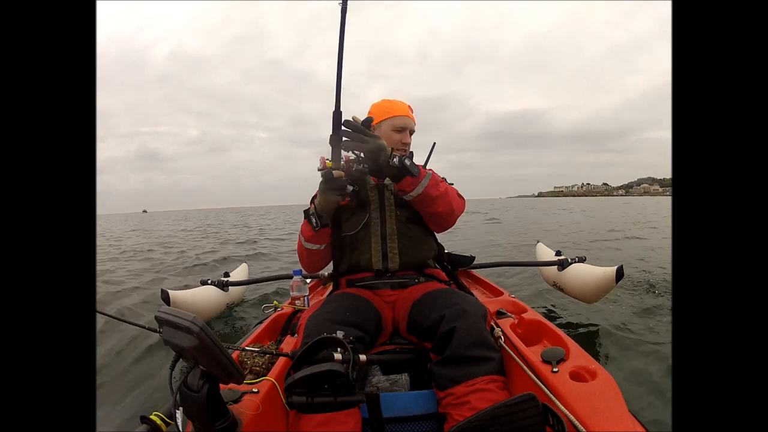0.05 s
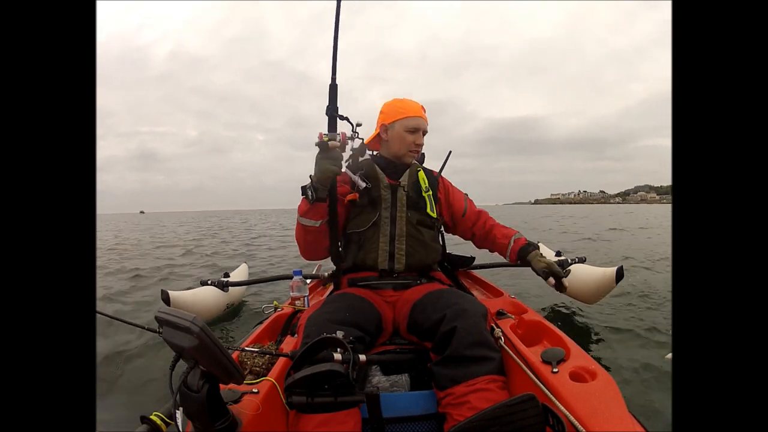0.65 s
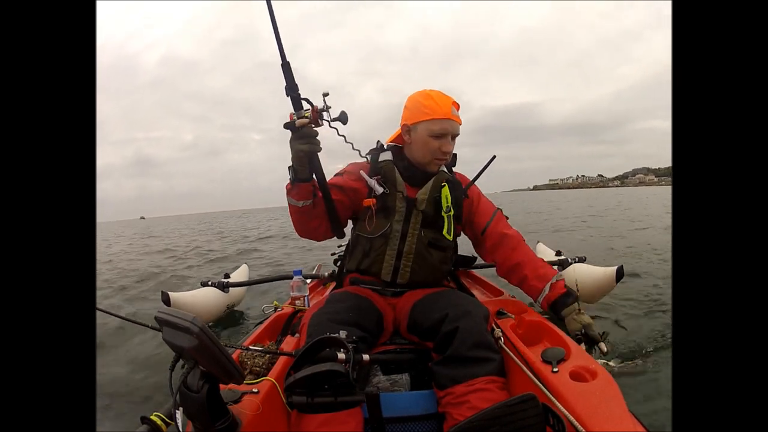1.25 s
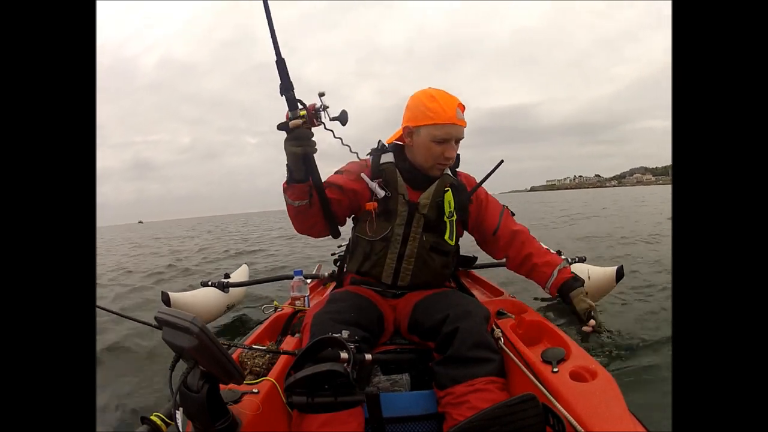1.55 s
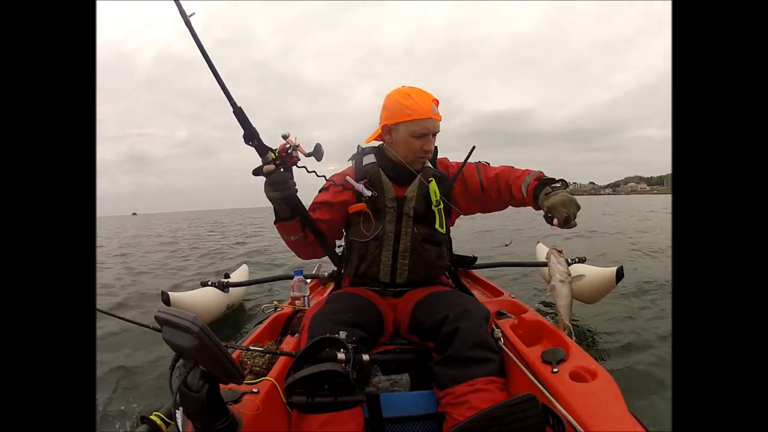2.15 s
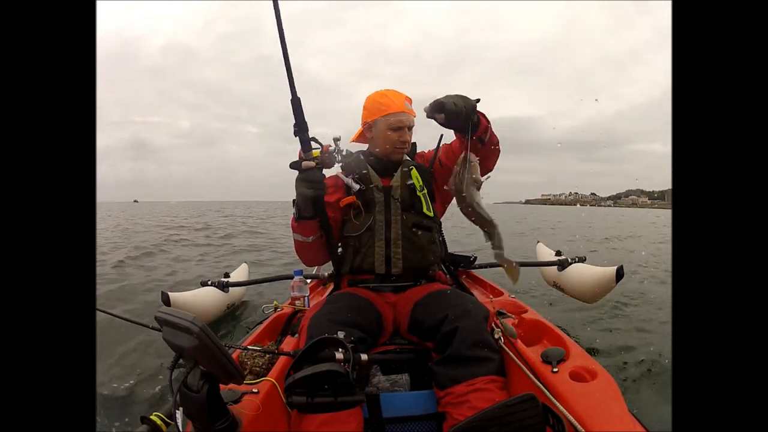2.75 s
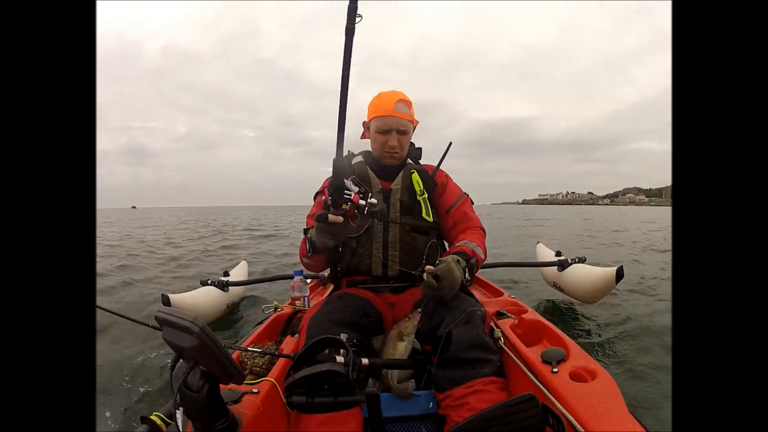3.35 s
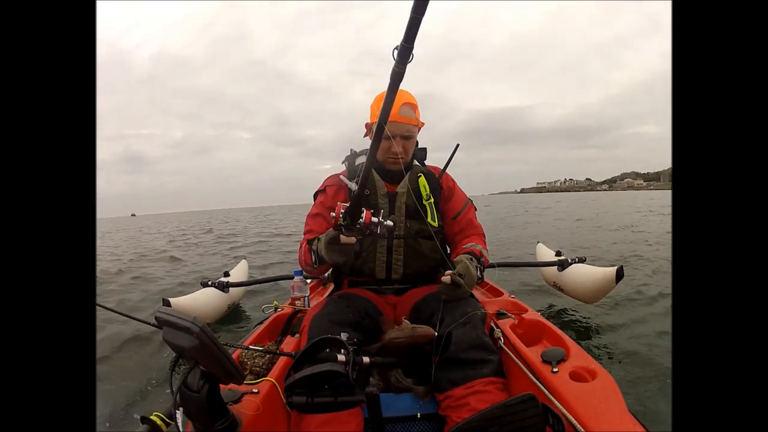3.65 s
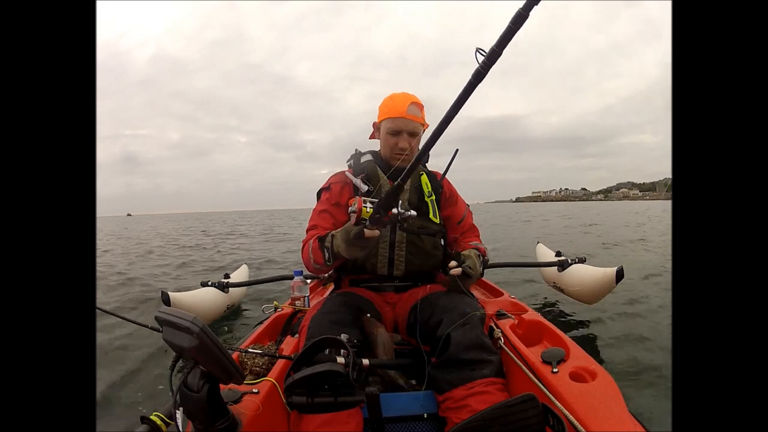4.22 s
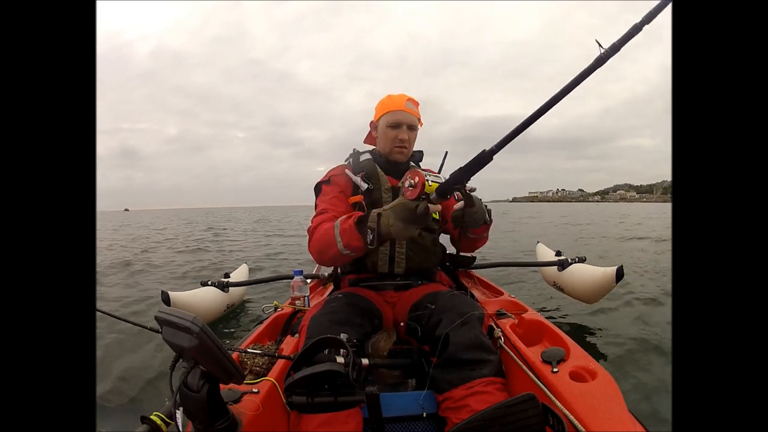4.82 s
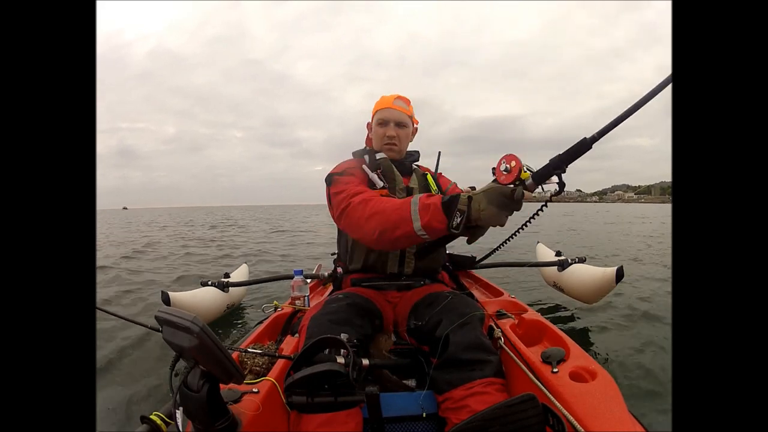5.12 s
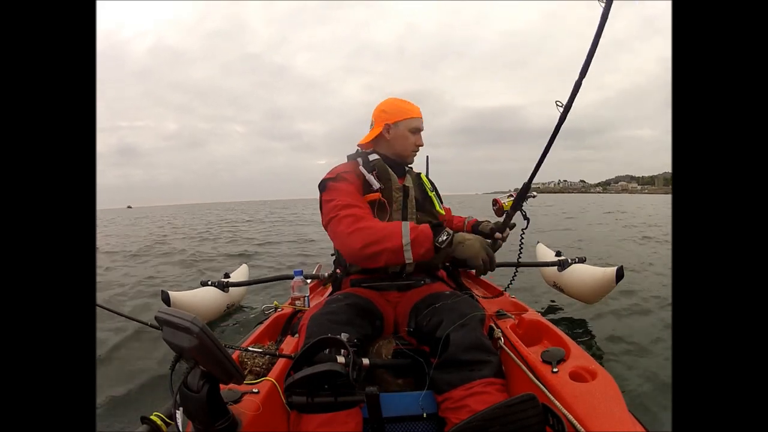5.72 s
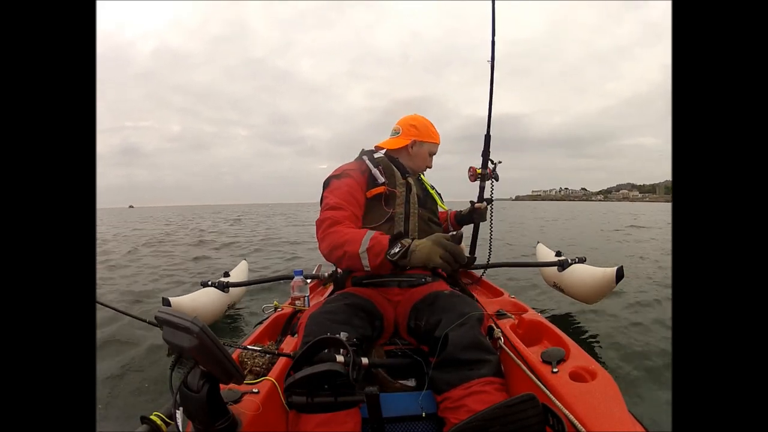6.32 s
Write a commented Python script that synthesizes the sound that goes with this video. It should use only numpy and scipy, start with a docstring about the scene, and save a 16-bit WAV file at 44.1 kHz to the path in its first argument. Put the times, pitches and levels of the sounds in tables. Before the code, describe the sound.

Heard close from the deck of a plastic kayak at sea, wavelets knock and splash on the hollow hull over a soft wind rumble. Tackle clicks against the shell and water trickles. A fish hits the deck hard, then flaps and thumps for about a second before the irregular slaps of water take over again. The knocks have a slightly gritty, lo-fi edge.

```python
"""A plastic kayak on a light chop, heard close and in mono from a camera microphone fixed to the deck.
A light wind rumbles over the wash of the sea. From the start wavelets slap the hollow hull, which knocks,
thumps and booms; water trickles and bubbles, and the angler's tackle clicks on the shell. At 2.7 s a fish
swung aboard lands hard and thrashes until about 4 s; then wavelets and tackle carry on. The camera's
coarse sampling adds a gritty sheen to every knock."""
import sys
import numpy as np
from scipy import signal
from scipy.fft import rfft, irfft
from scipy.io import wavfile

SR = 44100
rng = np.random.default_rng(int(sys.argv[2]) if len(sys.argv) > 2 else 0)


def transcribe(u):
    """Save the signal u as a 16-bit wav file named by the first command-line argument.

    u: samples, shape (n,) or (channels, n), limited to [-1, 1]; the rate is SR.
    q: integer samples, one column per channel.
    """
    v = np.clip(np.atleast_2d(u).T, -1, 1)
    q = np.round(v * 32767).astype(np.int16)
    wavfile.write(sys.argv[1], SR, q)


N = 281358

# Wavelets slapping under the hull. Each row: start in seconds, knock level in dB, knock centre in Hz,
# thump level in dB, panel pitch in Hz.
WAVELET_SLAPS = [(.121, -34, 1024, -41, 178), (0.1301, -24, 1020, -49, 178),
                 (0.5297, -20.5, 1283, -60, 178), (0.599, -29, 1193, -42, 180), (.612, -21, 1007, -33, 195),
                 (1.374, -24.5, 1397, -37.5, 166), (1.439, -34.5, 1055, -29.5, 163),
                 (1.4802, -24, 1060, -17.5, 179.7), (1.779, -27.5, 1045, -32, 164),
                 (1.829, -18, 1100, -57, 180), (1.835, -23.5, 910, -28.5, 174.7),
                 (2.009, -26, 1110, -20.5, 190.5), (2.046, -64, 830, -25.5, 145),
                 (2.143, -55, 830, -40, 119), (2.2445, -25, 950, -32.5, 212),
                 (2.291, -31.5, 760, -26.5, 116), (2.346, -26, 770, -32.5, 154),
                 (3.141, -28, 1305, -28, 129), (3.184, -17.5, 1060, -17.5, 157.4),
                 (3.233, -49, 1000, -24, 126), (4.439, -44.5, 1060, -30, 131.5),
                 (4.4649, -18.5, 1030, -31.5, 158), (4.807, -27, 946, -43.5, 210),
                 (4.821, -29, 714, -34, 204), (4.954, -26, 930, -16.5, 174.2),
                 (5.3839, -29.5, 933, -32.5, 202.5), (5.3938, -26, 828, -56, 205.6),
                 (5.629, -31, 921, -34.5, 183), (5.867, -28, 1140, -52.5, 180),
                 (5.875, -22, 1010, -27.5, 177.2), (6.128, -47.5, 1180, -38.5, 177.4),
                 (6.234, -16, 1020, -23.5, 191)]
# The colour of splashes and glancing touches on the shell. Each row: frequency in Hz, density in dB.
SHELL_COLOUR = [(200, -23.5), (380, -13), (490, -15), (630, 2), (780, -1.5), (900, 3.5), (1040, 6.5),
                (1250, -20), (1400, -5), (1700, 0.5), (2100, -2.5), (2600, -15), (3600, -10.5)]
# The fish landing and thrashing on deck. Each row: start in seconds, knock level in dB, crack in dB
# relative to that, thump level in dB, panel pitch in Hz, boom level in dB.
FISH_FLAPS = [(2.743, 0, -18.5, -0.5, 168.1, -29), (2.83, -32, -34, -28, 171, -27.5),
              (3.077, -39, -15, -26.5, 159, -31.5), (3.285, -17.5, -18.5, -18, 179, -19),
              (3.418, -8, -29.5, -7.5, 190, -22.5), (3.444, -21.5, -29, -36, 170, -48),
              (3.472, -2, -31.5, -9, 154.4, -30.5), (3.523, -28, -25, -17.5, 213, -26),
              (3.538, -13, -50, -38, 190, -45), (3.559, -19.5, -48, -45, 189, -55),
              (3.579, -23.5, -29, -13.5, 193, -39), (3.623, -16, -34, -16.5, 189, -52),
              (3.666, -23.5, -28, -24.5, 177, -59), (3.69, -21.5, -29, -15, 196, -55),
              (3.84, -27, -20, -30.5, 194, -58.5), (3.856, -23.5, -46, -36, 180, -50),
              (3.921, -32.5, -33, -42, 175, -49), (3.95, -21.5, -35, -24.5, 171, -30),
              (3.966, -20, -24.5, -23.5, 166, -41), (4.033, -24, -12.5, -25.5, 158.3, -27)]


def from_db(db):
    """Decibels to gain."""
    return 10 ** (np.asarray(db) / 20)


def rms_one(x):
    """Scale to rms 1."""
    return x / np.sqrt(np.mean(x ** 2) + 1e-20)


def add(track, s, sound):
    """Mix a sound into a track from s seconds on."""
    at = max(round(s * SR), 0)
    track[at:at + len(sound)] += sound[:max(N - at, 0)]


def colour(x, points):
    """Shape a steady signal by a spectrum of (Hz, dB) points; rms 1."""
    hz, db = np.transpose(points)
    bins = np.maximum(np.fft.rfftfreq(len(x), 1 / SR), 1)
    return rms_one(irfft(rfft(x) * from_db(np.interp(np.log(bins), np.log(hz), db)), len(x)))


def focus(points, centre_hz, tilt_db):
    """Tilt a spectrum down on both sides of a centre, by tilt_db one octave off."""
    hz, db = np.transpose(points)
    return np.column_stack([hz, db - tilt_db * np.abs(np.log2(hz / centre_hz)) ** 1.3])


def band(x, low_hz, high_hz):
    """Causal band-pass."""
    return signal.sosfilt(signal.butter(2, [low_hz, high_hz], "band", fs=SR, output="sos"), x)


def resonance(x, hz, width_hz):
    """Two-pole resonance with gain 1 at its peak."""
    r = np.exp(-np.pi * width_hz / SR)
    poles = [1, -2 * r * np.cos(2 * np.pi * hz / SR), r * r]
    return signal.lfilter(np.array([1, 0, -1]) * (1 - r * r) / 2, poles, x + 1e-18)


def drift(per_s):
    """A random wander of rms 1."""
    steps = rng.standard_normal(int(per_s * N / SR) + 2)
    return rms_one(np.interp(np.arange(N) * per_s / SR, np.arange(len(steps)), steps))


def swell(t, rise_s, t60, hold_s=0):
    """A smooth rise to 1, a hold, then a decay of 60 dB in t60 seconds."""
    rise = np.sin(np.pi / 2 * np.minimum(t / rise_s, 1)) ** 2
    return rise * from_db(-60 * np.maximum(t - rise_s - hold_s, 0) / t60)


def burst(noise, envelope):
    """A signal under an envelope, as strong as a sine under it would be."""
    x = noise * envelope
    return x * np.sqrt(np.sum(envelope ** 2) / (2 * np.sum(x ** 2)))


def droplets(per_s, spread_db, cycles, pitches=18):
    """Small bubbles burst at random, each ringing a few cycles at one of a set of pitches."""
    sizes = from_db(spread_db * np.minimum(rng.exponential(1, N), 4)) * rng.choice([-1, 1], N)
    pops = sizes * (rng.random(N) < per_s / SR)
    pitch_index = rng.integers(0, pitches, N)
    return rms_one(sum(resonance(pops * (pitch_index == k), hz, hz / cycles) / np.sqrt(hz)
                       for k, hz in enumerate(np.geomspace(550, 3600, pitches))))


def rumble_and_sea(lump_db=4.5, ripple_db=1.5):
    """A lumpy low rumble, the even wash of open water and a faint, steady patter of tiny droplets."""
    # The level of the low rumble: light wind, swelling with the hull's booming after heavy blows.
    # Each row: time in seconds, level in dB.
    rumble_levels = [(0, -58), (.2, -55), (.45, -56), (.75, -48.5), (1.002, -54.5), (1.3, -57), (2.15, -51),
                     (2.5, -62.5), (3.1, -46.5), (4.102, -41.5), (4.35, -50), (4.55, -47), (4.72, -52),
                     (4.949, -37.5), (5.298, -54), (6.38, -56.5)]
    # The colour of the rumble. Each row: frequency in Hz, density in dB.
    rumble_colour = [(20, -3.5), (40, -6), (80, -0.5), (130, 3.5), (185, 2.5), (250, -8.5), (400, -20.5),
                     (600, -37)]
    # The colour of the sea's wash. Each row: frequency in Hz, density in dB.
    wash_colour = [(200, -7), (400, -0.5), (680, 1.5), (850, -2.5), (1010, 4.5), (1300, -7.5), (1700, -3),
                   (2500, -10), (3300, -7), (3700, -10)]
    rumble_db = np.interp(np.arange(N) / SR, *np.transpose(rumble_levels)) - 1.5
    white = rng.standard_normal((2, N))
    rumble = from_db(rumble_db + lump_db * drift(per_s=34)) * colour(white[0], rumble_colour)
    wash = from_db(-64 + ripple_db * drift(per_s=34)) * colour(white[1], wash_colour)
    patter = from_db(-76) * droplets(per_s=84, spread_db=-4.5, cycles=14)
    return rumble + wash + patter


def contacts(fish_hz=770, tackle_hz=1156):
    """Wavelets, fish and tackle all strike the shell."""
    # Hard tackle clicking against the shell. Each row: start in seconds, level in dB.
    tackle_clicks = [(0.23, -45), (0.663, -46), (.705, -32), (0.795, -40), (1.056, -43.5), (1.8125, -35),
                     (2.002, -35), (2.627, -50), (2.932, -40.5), (2.971, -35.5), (3.358, -36), (4.415, -34),
                     (4.563, -49.5), (5.001, -42), (5.08, -43), (5.415, -43.5), (5.828, -46), (6.124, -36)]
    # Each row: start in seconds, level in dB, centre in Hz, relative crack in dB, heft in dB.
    return ([(s, db, hz, (thump_db - db) / 2 - 27, thump_db) for s, db, hz, thump_db, _ in WAVELET_SLAPS]
            + [(s, db, fish_hz, crack_db, thump_db) for s, db, crack_db, thump_db, _, _ in FISH_FLAPS]
            + [(s, db, tackle_hz, -5, db) for s, db in tackle_clicks])


def shell_knocks(rise_s=0.00092, glide=0.14, glide_s=0.0041, damping_s=0.0074, touch_s=0.012):
    """Each knock on the plastic: a light first touch, a sagging ring, the modes around it and a crack."""
    # Short modes of the plastic shell. Each row: frequency in Hz, level in dB.
    shell_modes = [(430, -5), (520, -7.5), (615, -2.5), (690, -4.5), (775, -2), (860, -2), (1015, 4.5),
                   (1120, -0.5), (1270, -2.5), (1395, -1.5), (1530, -6), (1650, 3), (1790, 2.5),
                   (1965, -11), (2120, -3.5)]
    t, out = np.arange(SR // 8) / SR, np.zeros(N)
    rows = contacts()
    white = rng.standard_normal((len(rows), 3, len(t)))
    for (s, db, hz, crack_db, heft_db), (chance, grit, brush) in zip(rows, white):
        # a heavy blow presses on for longer, wakes a wider range of modes and dies faster
        weight = np.clip(2 + db / 19.5, 0, 1)
        tilt_db, hold_s = 22 - 11 * weight, 0.0057 * weight
        t60 = 0.051 * 2 ** ((-28 - db) / 57)
        envelope = swell(t, rise_s, t60, hold_s) + from_db(-29.5) * swell(t, rise_s, t60=0.14)
        # the pitch sags through its centre as the contact spreads
        ring_hz = hz * (1 + glide * (2 * np.exp(-t / glide_s) - 1))
        ring = np.sin(2 * np.pi * np.cumsum(ring_hz) / SR)
        # each place of contact gives the modes strengths and phases of its own; high modes die first
        mode_hz, mode_db = focus(shell_modes, hz, tilt_db).T
        strength, phase = chance[:2 * len(mode_hz)].reshape(2, -1)
        fading = np.exp(-np.maximum(mode_hz[:, None] / hz - 1, 0) * t / damping_s)
        partials = fading * np.sin(2 * np.pi * (mode_hz[:, None] * t + phase[:, None]))
        modes = from_db(mode_db + 3 * strength) @ partials
        shell = burst(rms_one(modes) + from_db(5.5) * (1 - weight) * rms_one(ring), envelope)
        crack = burst(band(grit, 990, 3400), swell(t, rise_s=0.00067, t60=0.034, hold_s=hold_s))
        add(out, s, from_db(db) * (from_db(-5) * shell + from_db(crack_db) * crack))
        # the mass brushes the hull just before it lands
        touch_db = min(heft_db - 14, -40.5)
        touch = burst(colour(brush, focus(SHELL_COLOUR, hz, tilt_db)), swell(t, touch_s, t60))
        add(out, s - touch_s, from_db(touch_db) * touch)
    return out


def flexes(lag_s=0.003):
    """A panel gives just after a slap, swinging longer for a strong one; the fish's weight damps it."""
    # Each row: start in seconds, level in dB, panel pitch in Hz, t60 in seconds, boom level in dB.
    slaps = [(s + lag_s, db, hz, 0.092 * 2 ** ((db + 29.5) / 21.5), db - 18)
             for s, _, _, db, hz in WAVELET_SLAPS]
    flaps = [(s, db, hz, min(0.024 * 2 ** (-db / 9), 0.1), boom_db)
             for s, _, _, db, hz, boom_db in FISH_FLAPS]
    return slaps + flaps


def thumps_and_boom(boom_hz=74.26, thud_band_hz=(70, 240), low_cut_hz=57):
    """A struck panel swings for a few cycles; the whole hollow hull booms on below it. Returns both."""
    t, panels, boom = np.arange(SR) / SR, np.zeros(N), np.zeros(N)
    for s, db, hz, t60, boom_db in flexes():
        envelope = swell(t, rise_s=0.0036, t60=t60)
        swing = np.sin(2 * np.pi * hz * t) * envelope
        low_noise = band(rng.standard_normal(len(t)), *thud_band_hz)
        thud = band(burst(low_noise, envelope), *thud_band_hz)
        add(panels, s, from_db(db) * (swing + from_db(-10.5) * thud))
        hollow = np.sin(2 * np.pi * boom_hz * t) * swell(t, rise_s=0.011, t60=0.56)
        add(boom, s, from_db(boom_db) * hollow)
    # the panels' thumps carry no deep bass below about 57 Hz
    return signal.sosfilt(signal.butter(2, low_cut_hz, "high", fs=SR, output="sos"), panels), boom


def hull_ring(blows, split_hz=420, build_s=0.012):
    """Every blow leaves the hull ringing: a few clear modes and a dense tail whose lows last longest."""
    # Long modes of the hull. Each row: frequency in Hz, width in Hz, gain in dB.
    hull_modes = [(102, 20, -17), (122, 6.6, -8.5), (144, 8, -11), (186, 3.4, -16.5), (184.3, 7.3, -4.5),
                  (210, 24, -6), (259.9, 3.1, -20), (383, 9.1, 6.5), (652, 16, 2), (1020, 39, -19.5)]
    # The colour of the hull's dense after-ring. Each row: frequency in Hz, density in dB.
    tail_colour = [(50, -23.5), (110, 6.5), (190, -4.5), (300, -6), (450, -5), (680, -2.5), (1020, -32),
                   (1300, -22), (2200, -31), (3600, -24.5)]
    t = np.arange(SR) / SR
    dense = colour(rng.standard_normal(len(t)), tail_colour)
    tail = band(dense, 27, split_hz) * swell(t, build_s, t60=0.41)
    tail += band(dense, split_hz, 3500) * swell(t, build_s, t60=0.26)
    tail /= np.sqrt(np.mean(np.abs(rfft(tail)[100:1100]) ** 2))   # rms gain 1 from 100 to 1100 Hz
    modes = sum(from_db(db) * resonance(blows, hz, width) for hz, width, db in hull_modes)
    return modes + from_db(-12.5) * signal.fftconvolve(blows, tail)[:N]


def splashes(slap_splash_s=0.084, slap_splash_hz=1180):
    """Trickles, and a splash at each slap: droplets bursting against the shell, fine spray above."""
    # Water splashing and running off the hull. Each row: start in seconds, length in seconds,
    # level in dB, centre in Hz.
    trickles = [(.438, 0.02, -53, 880), (.65, 0.39, -56.5, 875), (1.409, 0.12, -45.5, 1220),
                (1.764, 0.12, -50.5, 1260), (1.974, 0.066, -42, 1360), (2.568, 0.42, -59, 1285),
                (2.752, 0.16, -45.5, 1154), (2.915, 0.27, -50, 890), (3.5, 0.28, -43.5, 730),
                (3.915, 0.14, -39.5, 850), (4.391, 0.13, -53, 1445), (4.935, 0.27, -50.5, 1080),
                (5.855, 0.078, -45.5, 1400), (6.221, 0.083, -43.5, 1400)]
    slap_splashes = [(s, slap_splash_s, (db + thump_db) / 2 - 33.5, slap_splash_hz)
                     for s, db, _, thump_db, _ in WAVELET_SLAPS]
    out = np.zeros(N)
    water = droplets(per_s=2400, spread_db=5, cycles=12) + 0.77 * rng.standard_normal(N)
    spray = rms_one(band(droplets(per_s=1300, spread_db=3, cycles=4), 2000, 4100))
    for s, length, db, hz in list(trickles) + slap_splashes:
        at = int(s * SR)
        t = np.arange(min(int(length * SR), N - at)) / SR
        drops = colour(water[at:at + len(t)], focus(SHELL_COLOUR, hz, tilt_db=4))
        # shallow, high splashes throw more spray than deep ones
        crackle = from_db(-22) * (hz / 1200) ** 3 * spray[at:at + len(t)]
        envelope = np.interp(t, [0, 0.12 * length, length], [0, 1, 0])
        add(out, s, from_db(db) * (drops + crackle) * envelope)
    return out


def bubbles_and_ping(climb_per_s=1.9):
    """A bubble rings and climbs in pitch as it nears the surface; one tackle click pings the same way."""
    # Single bubbles, and the brief high ping of a tackle click at 1.055 s.
    # Each row: start in seconds, peak in dB, first pitch in Hz, t60 in seconds.
    rings = [(0.681, -41, 994, .054), (.722, -41, 621, 0.13), (0.763, -40, 968, 0.058),
             (0.848, -44.5, 1020, 0.052), (1.055, -42, 3110, .015), (4.411, -46.5, 2530, 0.071),
             (5.335, -39, 1690, .025), (5.55, -49.5, 670, 0.12)]
    t, out = np.arange(SR // 6) / SR, np.zeros(N)
    for s, db, hz, t60 in rings:
        chirp = np.sin(2 * np.pi * hz * t * (1 + climb_per_s * t))
        add(out, s, from_db(db) * chirp * swell(t, rise_s=0.004, t60=t60))
    return out


def scene():
    """What reaches the deck microphone: blows, the ringing hull and the sea, alike in both channels."""
    panels, boom = thumps_and_boom()
    blows = shell_knocks() + panels + splashes()
    return np.tile(blows + hull_ring(blows) + boom + bubbles_and_ping() + rumble_and_sea(), (2, 1))


def record(dry, sampling_hz=8000, input_cutoff_hz=3780, output_cutoff_hz=15700):
    """The camera overloads on loud peaks and holds each coarse sample, mirroring sound into the treble."""
    narrow = signal.sosfiltfilt(signal.butter(10, input_cutoff_hz, fs=SR, output="sos"), dry)
    coarse = np.clip(signal.resample_poly(narrow, sampling_hz, SR, axis=1), -.87, .87)
    steps = np.repeat(coarse, 12, axis=1)
    held = signal.resample_poly(steps, SR, 12 * sampling_hz, axis=1)[:, :N]
    return signal.sosfiltfilt(signal.ellip(8, .1, 50, output_cutoff_hz, fs=SR, output="sos"), held)


dry = scene()
out = record(dry)
transcribe(out)
```